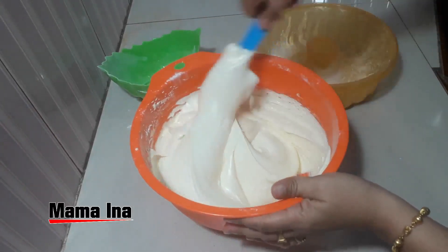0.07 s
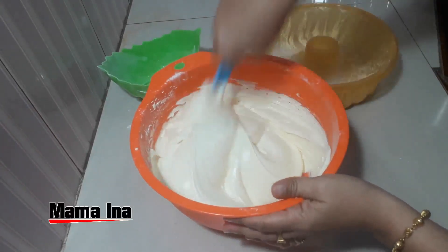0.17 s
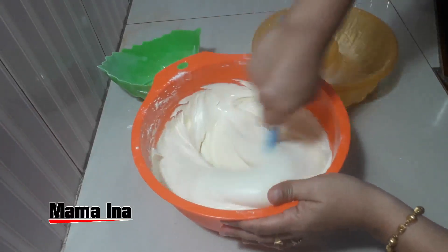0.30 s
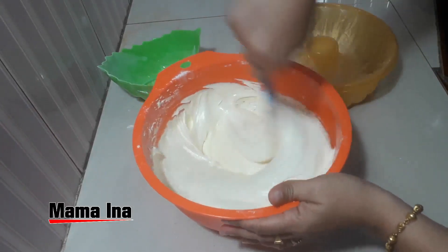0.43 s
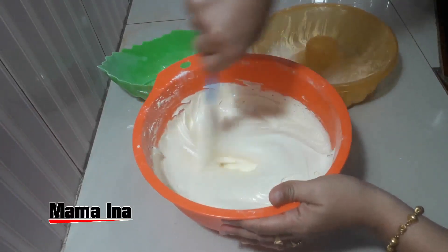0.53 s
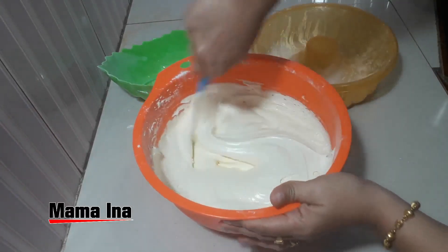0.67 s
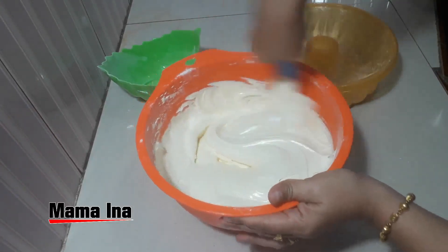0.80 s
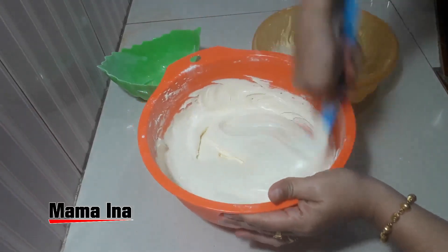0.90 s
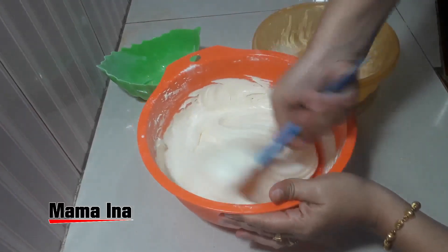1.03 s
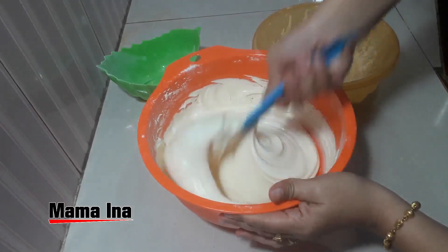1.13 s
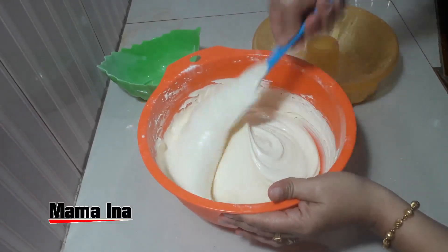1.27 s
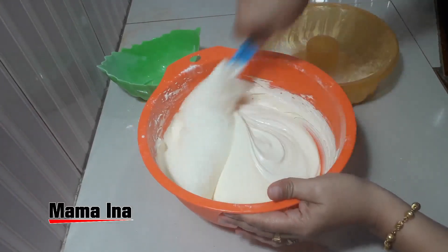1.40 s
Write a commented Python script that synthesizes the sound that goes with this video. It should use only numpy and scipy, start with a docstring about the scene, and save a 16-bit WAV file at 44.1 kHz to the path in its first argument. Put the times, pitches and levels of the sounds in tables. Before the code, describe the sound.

Spatula scraping a batter-filled plastic bowl in two quick strokes, with dull bumps, in a quiet kitchen

```python
"""In a quiet tiled kitchen, as an earlier stroke dies away, a spatula drags twice along the wall of
a plastic bowl of thick batter, then swishes lightly.
Tiny slips of the blade, made as random clicks, hiss, ring its edge and make the bowl rumble.
Bumps on the wall wake decaying bowl modes, noise bursts tick the edge, a short tone pops a bubble.
The kitchen rings on as sparse echoes, over a faint hum and hiss of shaped noise."""
import sys
import numpy as np
from scipy import signal
from scipy.fft import rfft, irfft, next_fast_len
from scipy.io import wavfile
from scipy.ndimage import uniform_filter1d

SR = 44100
rng = np.random.default_rng(int(sys.argv[2]) if len(sys.argv) > 2 else 0)


def gain_from_db(level_db):
    """Turn a decibel level (scalar or array-like) into a linear amplitude factor."""
    decades = np.asarray(level_db, float) / 20
    return 10 ** decades


def store_wav(level_fs):
    """Save 16-bit WAV to argv[1]."""
    pcm = np.round(np.clip(np.atleast_2d(level_fs), -1, 1) * 32767)
    wavfile.write(sys.argv[1], SR, pcm.T.astype(np.int16))


N = 63945  # length in samples

# modes of the plastic bowl: (frequency [Hz], level [dB], t60 [s])
BOWL = [(139, -6, .2), (188, -5, .18), (225, -1, .09), (402, -1, .14), (595, -4, .09), (510, -3, .035),
        (700, -3, .035), (315, -10, .05), (765, -9, .08), (856, -7, .12), (1150, -16, .07),
        (1362, -14, .08), (2250, -12, .06), (2490, -12, .07)]


def evened(x):
    """Brings a signal to an rms of 1."""
    return x / np.sqrt(np.mean(x ** 2) + 1e-20)


def read(points, hz):
    """Reads a table of (frequency, value) along a logarithmic frequency axis."""
    f, value = np.transpose(points)
    return np.interp(np.log(hz + 1), np.log(f + 1), value)


def coloured(x, points):
    """Shapes the spectrum of x by a table of (frequency [Hz], level [dB])."""
    size = next_fast_len(len(x) + 4096)
    gain = gain_from_db(read(points, np.fft.rfftfreq(size, 1 / SR)))
    return irfft(rfft(x, size) * gain, size)[:len(x)]


def resonate(x, hz, width_hz):
    """A resonance of gain 1 that follows hz: shift down to 0 Hz, smooth, shift back up."""
    turn = np.exp(2j * np.pi * np.cumsum(hz * np.ones(len(x))) / SR)
    r = np.exp(-np.pi * width_hz / SR)
    smooth = signal.lfilter([1 - r], [1, -r], x / turn + 1e-18)
    return 2 * (turn * smooth).real


def clicks(per_s, spread_db):
    """A random train of clicks of either sign, most small and a few large."""
    size = gain_from_db(spread_db * np.minimum(rng.exponential(1, N), 4))
    sign = rng.choice([-1., 1.], N)
    return evened(size * sign * (rng.random(N) < per_s / SR))


def add(mix, s, sound):
    """Lays a sound into the mix at s seconds."""
    part = mix[round(s * SR):][:len(sound)]
    part += sound[:len(part)]


def scrape():
    """Slips of the blade hiss and ring its edge, while knocks rock the bowl and rumble its wall."""
    # scrape level over time; it opens on the dying room echo of an earlier stroke:
    # (time [s], edge ring [dB], slip hiss re ring [dB], bowl rocking re ring [dB],
    #  wall rumble re ring [dB], brightest edge pitch [Hz])
    scrape_points = [(0, -54.5, -1, 0, -6, 4000), (.07, -59.5, -1.5, -15, 5, 4170),
                     (.13, -76.5, 14, 19, 11.5, 3500), (0.163, -72.5, 14.5, 6, 17.5, 3160),
                     (.178, -57, 14.5, 3, -15, 2580), (0.209, -34, -0.5, -25, -6, 3530),
                     (0.235, -29, -1, -25, -34, 4100), (0.248, -28, 1, -24, -1, 4100),
                     (0.282, -39.5, 6.5, -5.5, 0, 3570), (0.328, -37, 5, 2.5, 0, 3900),
                     (0.358, -49, 12, 9, -24, 4450), (0.384, -51.5, 2.5, 4, -22, 3400),
                     (.47, -59, 2, 3.5, -1, 4100), (.56, -73, 8, 11.5, -8, 4100),
                     (.6415, -72, 0, 5, -5, 2600), (.6435, -40, 2, -6, -8, 2450),
                     (0.688, -42, 0, 6.5, 5, 2700), (.75, -46, 10, -2, -5, 4150),
                     (.775, -39, -3, -9, -8, 5400), (.8, -38, -4, -10, -8, 5600),
                     (.85, -41, 3.5, -10.5, -16.5, 3900), (.92, -42, 6.5, -5, -10.5, 3620),
                     (.95, -41, 6.5, -8, -16, 4440), (.99, -41, 3, -12, -26, 4500),
                     (1.034, -32.5, -1.5, -30, -48, 4700), (1.054, -38.5, -3.5, -33, -11, 4270),
                     (1.078, -48.5, -1, -6, 5.5, 3240), (1.16, -59, 2, 2, -10, 3460),
                     (1.26, -97, -11, 22, -27, 4530), (1.3, -72, 6, -10, -29, 5000),
                     (1.325, -58, -18, -7, -17, 5100), (1.362, -58, -18, -7, -17, 5300),
                     (1.4, -67, -13, 4, -4, 5000), (1.436, -77, 9, 2, -20, 4000),
                     (1.438, -68.5, 15.5, -22, -27, 3900), (1.45, -62, 7, -4, 17, 3930)]
    # spectrum of the slip hiss: (frequency [Hz], level [dB per Hz])
    slip_spectrum = [(200, -35), (350, 1.5), (1000, -2), (1800, -1.5), (4200, -1.5), (8000, -6.5),
                     (9500, -8), (12500, -3.5), (15800, -13.5)]
    scrape_db = -2  # trim of the whole scrape
    slips_per_s, slip_spread_db, judder_db = 9000, 1, 1
    knocks_per_s, knock_spread_db = 1200, 3.
    wall_smother_t60_s = .08  # extra decay laid over the bowl modes

    s, ring_db, hiss_db, rock_db, wall_db, bright_hz = np.transpose(scrape_points)

    def along(values):
        return np.interp(np.arange(N) / SR, s, values)

    wobble = evened(uniform_filter1d(rng.standard_normal(N), size=300))
    judder = gain_from_db(judder_db * wobble)
    hiss_slips = clicks(slips_per_s, slip_spread_db) * judder
    hiss = evened(coloured(hiss_slips, slip_spectrum))
    ring_slips = clicks(slips_per_s, slip_spread_db) * judder
    ring = evened(patchy(edge(ring_slips, along(bright_hz))))
    out = ring * gain_from_db(along(ring_db)) + hiss * gain_from_db(along(ring_db + hiss_db))

    # the rocking sits low in the bowl modes, the rumble of the wall higher
    for db, hz, octaves, t60 in ((rock_db, 160., .5, 1.), (wall_db, 550., .9, wall_smother_t60_s)):
        body = bowl_ring(hz, octaves, np.zeros(len(BOWL)))
        body = body * gain_from_db(-60 * np.arange(len(body)) / SR / t60)
        knocks = clicks(knocks_per_s, knock_spread_db)
        rumble = evened(signal.oaconvolve(knocks, body)[:N])
        out = out + rumble * gain_from_db(along(ring_db + db))
    return gain_from_db(scrape_db) * out


def edge(x, bright_hz):
    """The short ring of the blade edge, brightest where the blade's bend puts it."""
    # resonances of the blade edge: (frequency [Hz], width [Hz], level [dB])
    edge_resonances = [(1600, 720, -10.5), (2450, 320, -1), (3135, 315, -1), (4100, 730, -2.5),
                       (4640, 630, -0.5), (5500, 1740, -7)]
    bright_width_hz, bright_db = 1200, 6
    ring = sum((-1) ** k * gain_from_db(db) * resonate(x, hz, width_hz)
               for k, (hz, width_hz, db) in enumerate(edge_resonances))
    return ring + gain_from_db(bright_db) * resonate(ring, bright_hz, bright_width_hz)


def patchy(x):
    """The wet film under the blade changes, so bands swell and sink in small patches."""
    patchy_db = 2.5  # rms of the swelling
    z = signal.stft(x, nperseg=512, noverlap=384)[2]
    noise = rng.standard_normal(z.T.shape)
    over_time = uniform_filter1d(noise, size=12, axis=0)
    field = uniform_filter1d(over_time, size=7, axis=1).T
    return signal.istft(z * gain_from_db(patchy_db * evened(field)), nperseg=512, noverlap=384)[1][:N]


def bowl_ring(centre_hz, octaves, phases):
    """The bowl modes as a blow with its energy around centre_hz wakes them."""
    blow_rise_s = .0007
    t = np.arange(SR // 4) / SR
    ring = np.zeros(len(t))
    for (hz, db, t60), phase in zip(BOWL, phases):
        woken_db = db - 6 * (np.log2(hz / centre_hz) / octaves) ** 2
        ring += gain_from_db(woken_db - 60 * t / t60) * np.sin(2 * np.pi * hz * t + phase)
    return ring * (1 - np.exp(-t / blow_rise_s))


def bumps():
    """Each bump of the blade on the wall rings the bowl until the batter damps it."""
    # bumps: (time [s], peak level [dB], centre of the blow's energy [Hz], its spread [octaves],
    #         time until the damping [s])
    bump_list = [(.2455, -15, 255, .6, .0095), (.6436, -17.5, 440, .9, .016), (.155, -43, 420, .6, .03),
                 (.259, -23, 820, .5, .02), (.369, -36, 550, .4, .01), (.484, -38, 180, .5, .02),
                 (.525, -44, 150, .5, .03), (.682, -29, 480, .6, .01), (.934, -28, 680, .4, .01),
                 (1.437, -43, 600, .6, .02)]
    damped_db, damping_s = -13, .002  # drop of the ring, and how long the drop takes
    out = np.zeros(N)
    all_phases = rng.normal(0, .3, (len(bump_list), len(BOWL)))
    for (s, db, hz, octaves, free_s), phases in zip(bump_list, all_phases):
        ring = bowl_ring(hz, octaves, phases)
        t = np.arange(len(ring)) / SR
        ring = ring * gain_from_db(damped_db * np.clip((t - free_s) / damping_s, 0, 1))
        add(out, s, -gain_from_db(db) * ring / abs(ring).max())
    return out


def ticks():
    """Each tick is a dying noise burst of slips through the blade edge; one bubble pops."""
    # ticks: (time [s], rms level of the first 150 samples [dB], decay time constant [s],
    #         brightest edge pitch [Hz])
    tick_list = [(0.186, -44, .001, 2500), (0.205, -32.5, 0.0013, 4130), (0.222, -29, 0.0066, 3740),
                 (0.232, -36, 0.00073, 3900), (.239, -24, 0.0017, 4340), (0.2417, -21, 0.0037, 4470),
                 (0.6405, -42.5, 0.009, 2450), (0.658, -42, 0.015, 2530), (0.9313, -26.5, 0.00093, 4900),
                 (.940, -40, 0.002, 4400)]
    pop_s, pop_db, pop_hz, pop_length_s = .9081, -19, 1650, .00042
    out = np.zeros(N)
    t = np.arange(2000) / SR
    bursts = rng.standard_normal((len(tick_list), len(t)))
    for (s, db, length_s, hz), burst in zip(tick_list, bursts):
        sound = edge(burst * np.exp(-t / max(length_s, 1e-4)), hz)
        add(out, s, gain_from_db(db) * sound / np.std(sound[:150]))

    # the pop: a tone that swells and dies as a bell curve, centred on pop_s
    u = t - .003
    swell = np.exp(-(u / pop_length_s) ** 2 / 2)
    add(out, pop_s - .003, gain_from_db(pop_db) * swell * np.cos(2 * np.pi * pop_hz * u))
    return out


def kitchen(x):
    """Sparse echoes of random sign, each band dying at its own speed."""
    # decay of the kitchen: (frequency [Hz], t60 [s])
    decay_times = [(150, 0.4), (600, 0.63), (2000, 0.47), (5000, 0.62), (12000, .5)]
    taps = np.zeros(SR)
    at = np.arange(200, SR - 20, 20) + rng.integers(0, 20, (SR - 201) // 20)  # one echo per 20 samples
    taps[at] = rng.choice([-1., 1.], len(at))
    hz, t, z = signal.stft(taps, SR, nperseg=256)
    decay = gain_from_db(-60 * t / read(decay_times, hz)[:, None])
    tail = signal.istft(z * decay, SR, nperseg=256)[1]
    return signal.fftconvolve(x, tail / np.linalg.norm(tail))[:N]


def floor():
    """Steady hum and hiss of the kitchen, as shaped noise."""
    # spectrum of the hum and hiss: (frequency [Hz], level [dB per Hz])
    floor_spectrum = [(20, -47), (40, 4.5), (70, 0.5), (130, 7), (200, 0.5), (300, -10), (450, -8),
                      (650, -34), (1100, -6.5), (1400, -16.5), (2700, -29), (4200, -22), (6500, -14),
                      (9500, -25), (11600, -11), (15000, -26)]
    floor_db = -59
    return gain_from_db(floor_db) * evened(coloured(rng.standard_normal(N), floor_spectrum))


def capsule_noise():
    """Steady self-noise of the two microphone capsules, as shaped noise."""
    # spectrum of the self-noise: (frequency [Hz], level [dB per Hz])
    noise_spectrum = [(12, -32), (20, -13), (255, -12.5), (410, -14), (499, -17), (678, -10), (802, -13),
                      (13200, -15.5), (16000, -14.5)]
    noise_db = -66.5
    return gain_from_db(noise_db) * evened(coloured(rng.standard_normal(N), noise_spectrum))


def scene():
    """Everything sits in the middle; only capsule noise, of opposite sign, parts the channels."""
    low_cut_hz, kitchen_db = 115, -12
    low_cut = signal.butter(2, low_cut_hz, "high", fs=SR)
    dry = signal.lfilter(*low_cut, scrape() + bumps() + ticks())
    mid = dry + gain_from_db(kitchen_db) * kitchen(dry) + floor()
    side = capsule_noise()
    return np.array([mid + side, mid - side])


def roll_off(x):
    """The treble ends steeply here."""
    return signal.sosfilt(signal.butter(12, 16470, fs=SR, output="sos"), x)


def record(dry):
    """Cuts the extreme treble of both channels and finishes the mix."""
    # band limit: (frequency [Hz], level [dB])
    band_limit = [(15700, 0), (16050, -60)]
    mix = np.array([coloured(x, band_limit) for x in dry])
    return roll_off(mix)


dry = scene()
out = record(dry)
store_wav(out)
```